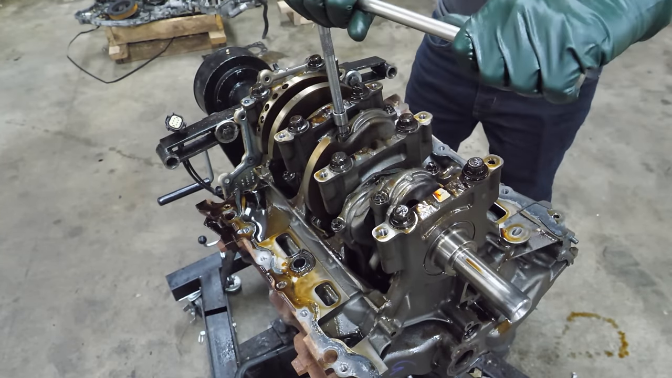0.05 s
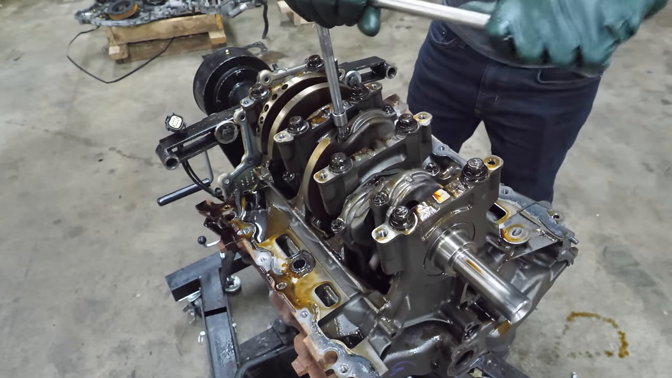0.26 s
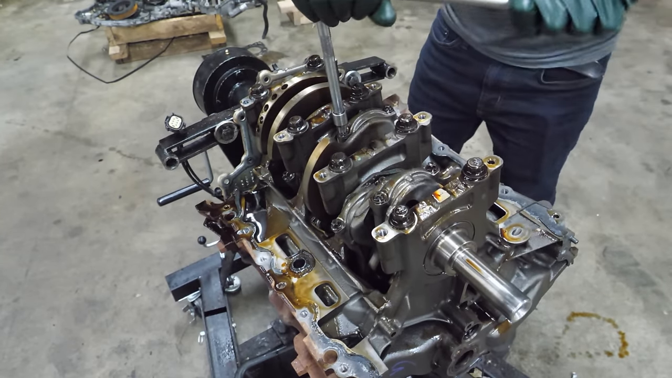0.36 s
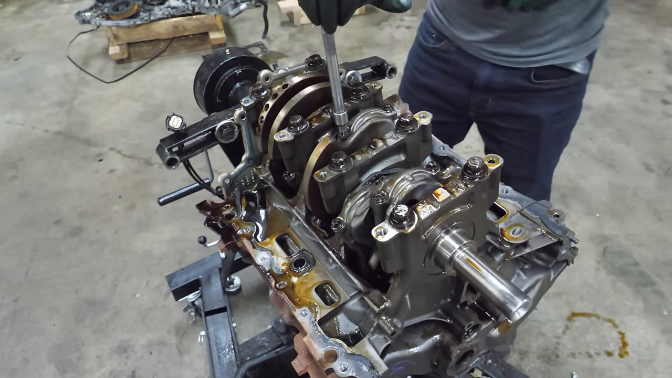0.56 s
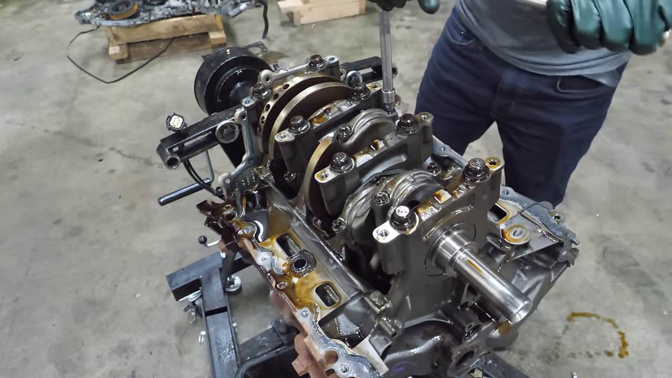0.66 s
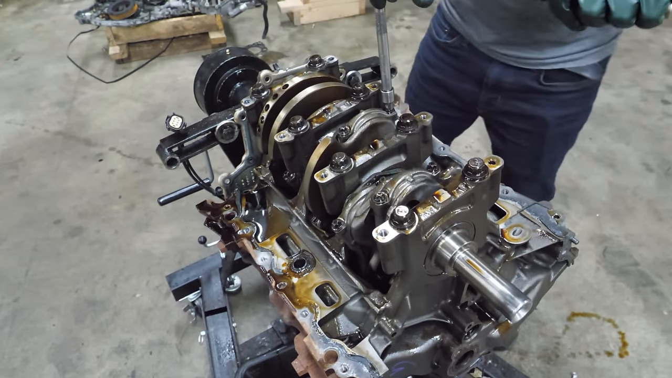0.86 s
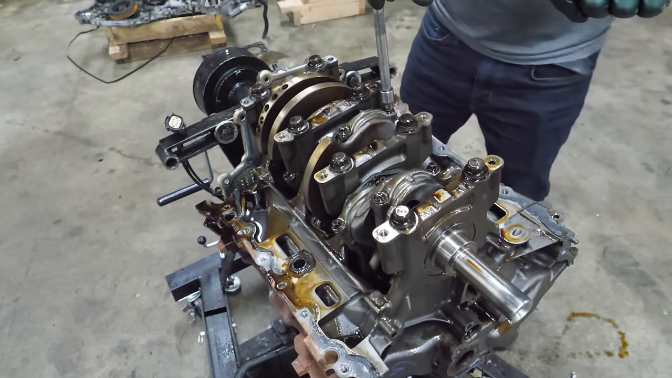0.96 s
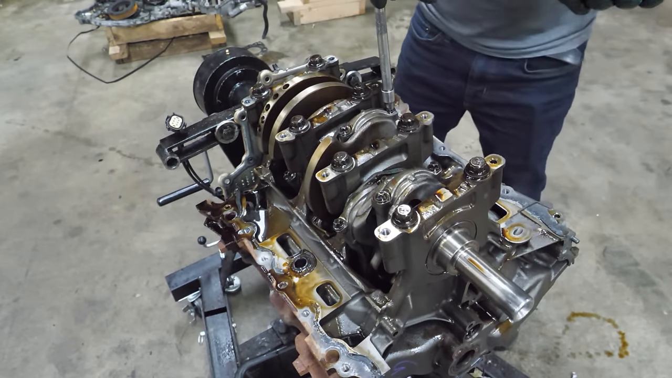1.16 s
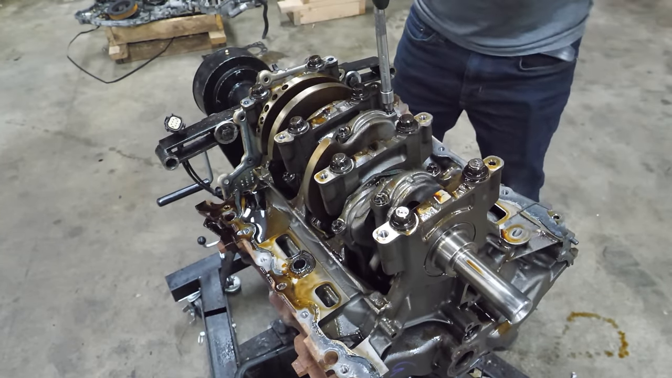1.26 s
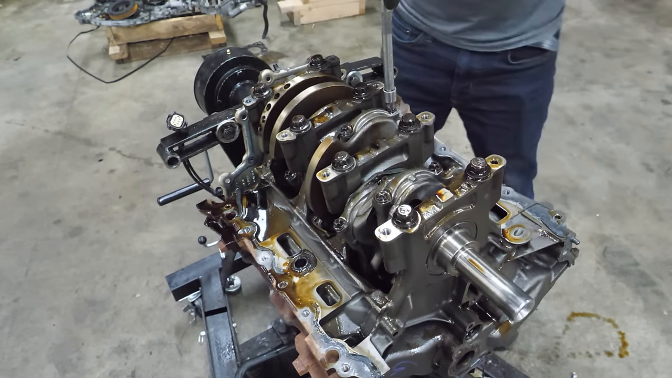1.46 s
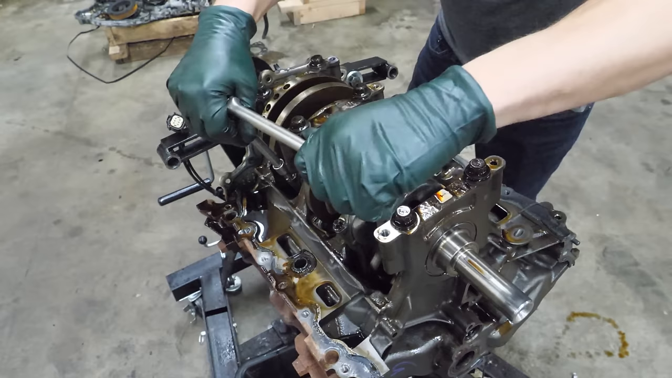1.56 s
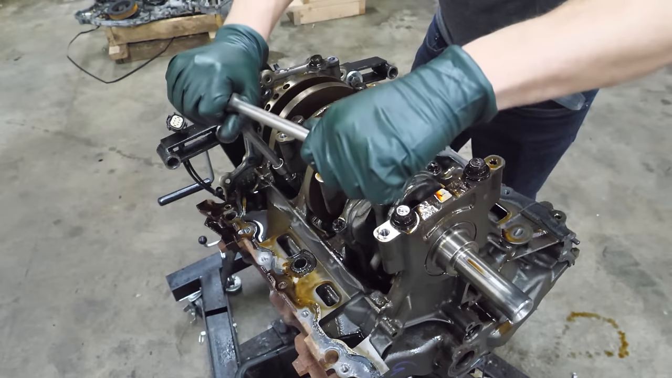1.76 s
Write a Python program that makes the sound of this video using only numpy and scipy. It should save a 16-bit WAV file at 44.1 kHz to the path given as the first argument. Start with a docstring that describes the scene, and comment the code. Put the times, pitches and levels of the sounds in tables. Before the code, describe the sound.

Tight engine bolts crack loose under a long steel bar, close up in a hard-walled workshop. Two sharp metallic snaps come first, then faint tool ticks, then two brighter snaps, each with a brief ring and short echo.

```python
"""A hard-walled workshop, close up: a long breaker bar cracks tight engine bolts loose.
Each time the thread slips, steel chatters for a few milliseconds, bar and socket ring briefly,
the block jolts on its stand and the room answers with an echo that ends abruptly.
Between cracks the tool shifts and gloves rub, over a low room tone."""
import sys
import numpy as np
from scipy import signal
from scipy.fft import rfft, irfft
from scipy.io import wavfile

SR = 44100
rng = np.random.default_rng(int(sys.argv[2]) if len(sys.argv) > 2 else 0)


def master_out(mix):
    """Clip the mix to full scale and print it as 16-bit PCM to the path in sys.argv[1]."""
    frames = np.transpose(np.atleast_2d(mix))
    ceiling = np.clip(frames, -1, 1)
    pcm = np.round(ceiling * 32767).astype(np.int16)
    wavfile.write(sys.argv[1], SR, pcm)


N = 79380

# Thread slips: t/s, level/dB, rise/s, decay/s, body/dB, treble/dB, fizz/dB,
# squeak f/Hz, squeak level/dB, jolt level/dB, jolt fall/s, echo level/dB
SLIPS = [ (-0.017, -8, 0.0022, 0.0032, -1.5, 2, -11, 4700, -18, -19, 0.0029, -41),
         (0.2360, -10, 0.0032, 0.0031, 1, -8.5, -2, 5578, -17, -19, 0.0099, -38),
         (0.9189, -14.5, 0.0014, 0.005, -3.5, 9, 3.5, 3573, -14.5, -11.5, 0.0051, -41),
         (1.1960, -15, 0.0017, 0.0048, -1, 11.5, 7.5, 8520, -16.5, -16, .0035, -41), ]
CHATTER_EQ = [(150, -32), (500, -14.5), (800, -1), (1050, -6.5), (1500, -8), (2200, -5.5), (2750, -13.5),
              (3500, 2.5), (4400, -3.5), (5750, 3), (6300, -2), (6800, -1.5), (7700, -13.5), (9000, -11.5),
              (9800, -16.5), (11100, -17), (11900, -24.5), (15200, -25), (16000, -39)]  # colour of the chatter: f/Hz, level/dB
# Stereo fizz added above about 7 kHz on each crack: f/Hz, side level/dB
TREBLE_SIDE = [(100, -62.5), (5500, -48.5), (7500, -20.5), (14000, -11.5)]
STEEL_MODES = [(1092, -17, 0.054), (2225, -24.5, 0.024), (2355, -16, 0.046), (3858, -14, 0.01),
               (4145, -11.5, 0.036), (4880, -20.5, 0.012), (4950, -7, 0.047), (5470, -10.5, 0.04),
               (5200, -16.5, 0.036), (5570, -18.5, 0.033), (6835, -11.5, 0.034), (7020, -16.5, 0.011),
               (8700, -25.5, 0.063), (11500, -25, 0.034)]  # ring of bar and socket: f/Hz, level/dB, t60/s
ECHO_EQ = [(60, -16.5), (150, -7), (400, -16), (980, -16.5), (1090, -8), (1260, -13), (1450, -9),
           (1900, -8.5), (2500, -12.5), (3300, -4), (4100, -7.5), (4600, -1), (5050, -1.5), (5750, 0),
           (6400, -6.5), (7200, -9), (7900, -14.5), (8800, -16), (9800, -24), (12500, -25), (15200, -29),
           (16000, -37)]  # colour of the workshop's echo: f/Hz, level/dB
ECHO_DECAY = [(100, 0.17), (500, 0.87), (1100, 1.09), (2500, 1.096), (5500, 0.78), (8000, 0.76),
              (14000, 0.76)]  # its decay: f/Hz, t60/s
ECHO_SPREAD = [(100, -18.5), (800, -18.5), (2500, -21), (5500, -24.5), (8000, -5), (13000, -7.5)]  # side signal of the echo: f/Hz, side level/dB
TOOL_TICKS = [(0.612, -53.5, 0.0041, 3400, 0.62), (0.773, -52, 0.015, 4320, 0.55),
              (0.7711, -68.5, 0.0095, 595, 0.3), (0.7719, -57, 0.018, 49.7, 1.4),
              (0.8413, -56, 0.0033, 3300, 1.2), (0.8546, -55, .0012, 8500, 0.38),
              (0.854, -50.5, 0.003, 656, 0.42)]  # small knocks of the tool: t/s, level/dB, decay/s, f/Hz, width/octaves
RUB_FADER = [(0.70, -80), (0.77, -72), (0.82, -66.5), (0.88, -75.5), (0.95, -95), (1.60, -94), (1.68, -68),
             (1.74, -66.5), (1.80, -65.5)]  # swells of glove and sleeve friction: t/s, level/dB
RUB_EQ = [(100, 4), (500, -3), (1000, -2.5), (2200, -3), (3500, -1), (5200, -2.5), (9000, -6),
          (15000, -14.5)]  # colour of the rubbing: f/Hz, level/dB
ROOM_TONE_EQ = [(15, -19.5), (28, -5.5), (48, 1.5), (75, -8), (170, -11), (280, -16.5), (600, -21.5),
                (1400, -30), (5000, -31.5), (9000, -32.5), (15000, -36)]  # colour of the room tone: f/Hz, level/dB
ROOM_TONE_SPREAD = [(100, -23), (700, -9.5), (2500, -3.5), (5500, -2), (13000, -21)]  # side signal of the room tone: f/Hz, side level/dB

BODY_HZ, TREBLE_HZ, TREBLE_WIDTH_HZ, FIZZ_HZ = 2300, 8500, 1000, 9800  # EQ bands set per slip
SPIT_DB, SPIT_HZ, SPIT_DECAY_S = -16, 8500, .0015  # level relative to the chatter
SQUEAK_T60_S = 0.025  # the one mode that each slip drives hardest
KNOCK_DB, KNOCK_BAND_HZ = -4, (815, 2100)  # peak relative to the slip's level plus body
JOLT_DELAY_S, JOLT_WIDTH_S, RECOIL, JOLT_LOW_HZ = .0019, .00055, 1.21, 38
ECHO_RISE_S, ECHO_END_S, ECHO_CUT_S = 0.017, .379, .003
ECHO_EQ_SHARE = 0.2  # how much of a slip's EQ carries into its echo
ECHO_RING_DB, ECHO_RING_HZ = 2, 35  # lift and half-width of the steel's modes in the echo
ECHO_RIPPLE_DB, ECHO_RIPPLE_STEP_HZ = 1.9, 90
EARLY_BOOST, EARLY_S = 1, 0.046  # extra push of the first reflections
ENGINE_HZ, ENGINE_DB, ENGINE_T60_S = 1088, -18, 0.77  # long ring, level relative to the echo
TICK_RISE_S, TICK_SEND_DB = 0.0008, -25  # echo send for a decay of EARLY_S; shorter ticks send less
GLOVE_AT_S, GLOVE_WIDTH_S, GLOVE_HZ, GLOVE_WIDTH_HZ, GLOVE_DB = 1.703, 0.032, 2157, 170, -68
ROOM_TONE_DB, CEILING, TOP_HZ = -63, .8, 15900


def bolt_cracks():
    """Each slip of the thread stacks four layers: snap, knock, jolt and echo."""
    out = np.zeros((2, N))
    for at, level_db, rise, decay, *eq, squeak_hz, squeak_db, jolt_db, fall, echo_db in SLIPS:
        body_db = eq[0]
        add(out, at, snap(level_db, rise, decay, eq, squeak_hz, squeak_db))
        add(out, at, amp(level_db + body_db + KNOCK_DB) * knock(rise))
        add(out, at, amp(jolt_db) * jolt(fall))
        add(out, at, amp(echo_db) * echo(eq))
    return out


def snap(level_db, rise, decay, eq, squeak_hz, squeak_db):
    """The thread lets go: a bright spit, and chatter that swells, dies and sets the steel ringing."""
    t = np.arange(8192) / SR
    attack = np.minimum(t / rise, 1)
    envelope = attack * np.exp(-np.maximum(t - rise, 0) / decay)
    chatter = wide_noise(lambda f: read(CHATTER_EQ, f) + slip_eq(f, *eq), TREBLE_SIDE, len(t))
    chatter *= envelope
    chatter *= np.linalg.norm(envelope) / np.linalg.norm(chatter.mean(0))  # envelope sets the energy
    spit = noise(lambda f: read(CHATTER_EQ, f) - 20 * np.log10(1 + (SPIT_HZ / (f + 1)) ** 8), len(t))
    spit *= amp(SPIT_DB) * t / SPIT_DECAY_S * np.exp(1 - t / SPIT_DECAY_S)
    steel = sum(amp(db + slip_eq(hz, *eq)) * ring(t, hz, t60) for hz, db, t60 in STEEL_MODES)
    squeak = amp(squeak_db) * attack * ring(t, squeak_hz, SQUEAK_T60_S)
    return amp(level_db) * (chatter + spit + attack * steel) + squeak


def slip_eq(hz, body_db, treble_db, fizz_db):
    """Voices one crack, in dB: low shelf for body, bell for treble, high shelf for fizz."""
    body = 1 / (1 + (hz / BODY_HZ) ** 6)
    treble = np.exp(-((hz - TREBLE_HZ) / TREBLE_WIDTH_HZ) ** 2)
    fizz = 1 - 1 / (1 + (hz / FIZZ_HZ) ** 20)
    return body_db * body + treble_db * treble + fizz_db * fizz


def knock(rise):
    """The bolt's sudden release: a sharp mid-range click at the top of the swell."""
    band = signal.butter(2, KNOCK_BAND_HZ, "bandpass", fs=SR, output="sos")
    click = signal.sosfilt(band, np.arange(8192) == round(rise * SR))
    return click / abs(click).max()


def jolt(fall):
    """The block recoils and lurches: one low push of air."""
    t = np.arange(8192) / SR - JOLT_DELAY_S
    push = (1 + np.tanh(t / JOLT_WIDTH_S * 2)) / 2 * np.exp(-t / fall)
    recoil = RECOIL / 2 * np.exp(-(t / JOLT_WIDTH_S + .5) ** 2)
    low_cut = signal.butter(2, JOLT_LOW_HZ, "highpass", fs=SR, output="sos")
    return signal.sosfilt(low_cut, push - recoil)


def echo(eq=(0, 0, 0)):
    """Hard walls throw back a diffuse wash, with the engine's long ring in it; the tail is gated."""
    t = np.arange(32768) / SR
    bumps = rng.standard_normal(512)

    def colour(f):
        """The room's colour, with the steel's modes and chance peaks in it."""
        peaks = sum(1 / (1 + ((f - hz) / ECHO_RING_HZ) ** 2) for hz, _, _ in STEEL_MODES)
        ripple = ECHO_RIPPLE_DB * np.interp(f / ECHO_RIPPLE_STEP_HZ, np.arange(len(bumps)), bumps)
        return read(ECHO_EQ, f) + ECHO_EQ_SHARE * slip_eq(f, *eq) + ECHO_RING_DB * peaks + ripple

    hz, when, bands = signal.stft(wide_noise(colour, ECHO_SPREAD, len(t)), SR, nperseg=256)
    fade = amp(-60 * when / read(ECHO_DECAY, hz)[:, None])
    wash = signal.istft(bands * fade, SR, nperseg=256)[1][:, :len(t)]
    wash *= 1 + EARLY_BOOST * np.exp(-t / EARLY_S)
    engine = amp(ENGINE_DB) * ring(t, ENGINE_HZ, ENGINE_T60_S)
    gate = (1 - np.tanh((t - ECHO_END_S) / ECHO_CUT_S)) / 2
    return (wash + engine) * np.minimum(t / ECHO_RISE_S, 1) * gate


def tool_ticks():
    """The socket shifts and seats on a bolt head: gritty ticks with a touch of room."""
    out, t, room = np.zeros((2, N)), np.arange(8192) / SR, echo()
    for at, level_db, decay, centre_hz, octaves in TOOL_TICKS:
        grit = noise(lambda f: -20 * np.log10(1 + (np.log2((f + 1) / centre_hz) / octaves) ** 2), len(t))
        envelope = np.minimum(t / TICK_RISE_S, 1) * np.exp(-np.maximum(t - TICK_RISE_S, 0) / decay)
        add(out, at, amp(level_db) * grit * envelope)
        add(out, at, amp(level_db + TICK_SEND_DB) * np.sqrt(decay / EARLY_S) * room)
    return out


def gloves():
    """Rubber gloves and sleeves rub as the grip changes, with one faint squeak."""
    t = np.arange(N) / SR
    rub = amp(np.interp(t, *np.transpose(RUB_FADER))) * noise(lambda f: read(RUB_EQ, f), N)
    squeak = noise(lambda f: -20 * np.log10(1 + ((f - GLOVE_HZ) / GLOVE_WIDTH_HZ) ** 2), N)
    swell = np.exp(-((t - GLOVE_AT_S) / GLOVE_WIDTH_S) ** 2 / 2)
    return rub + amp(GLOVE_DB) * squeak * swell


def room_tone():
    """A steady bed of low rumble and thin hiss."""
    return amp(ROOM_TONE_DB) * wide_noise(lambda f: read(ROOM_TONE_EQ, f), ROOM_TONE_SPREAD, N)


def amp(db):
    """Decibels to gain."""
    return 10 ** (np.asarray(db) / 20)


def read(points, hz):
    """Reads a curve on a log-frequency axis."""
    f, value = np.transpose(points)
    return np.interp(np.log(hz + 1), np.log(f + 1), value)


def add(mix, start_s, sound):
    """Lays a mono or stereo sound into the mix, trimming any overhang."""
    at = round(start_s * SR)
    sound = sound[..., max(-at, 0):]
    part = mix[:, max(at, 0):][:, :sound.shape[-1]]
    part += sound[..., :part.shape[-1]]


def ring(t, hz, t60):
    """One dying mode at a random phase."""
    return amp(-60 * t / t60) * np.sin(2 * np.pi * (hz * t + rng.random()))


def noise(colour, size):
    """Noise of rms 1, its spectrum shaped in dB by colour(Hz)."""
    hz = np.fft.rfftfreq(size, 1 / SR)
    wave = irfft(amp(colour(hz)) * np.exp(2j * np.pi * rng.random(len(hz))), size)
    return wave / np.sqrt(np.mean(wave ** 2) + 1e-20)


def wide_noise(colour, spread, size):
    """Stereo noise: a shared mid and a weaker side."""
    mid = noise(colour, size)
    side_gain = amp(read(spread, np.fft.rfftfreq(size, 1 / SR)))
    side = irfft(rfft(noise(colour, size)) * side_gain, size)
    return np.array([mid + side, mid - side])


def scene():
    """The work sits in the middle; echo and room tone spread a little."""
    return bolt_cracks() + tool_ticks() + gloves() + room_tone()


def record(dry):
    """Soft-clips the peaks, then cuts the very top."""
    rounded = dry / (1 + (dry / CEILING) ** 4) ** (1 / 4)
    high_cut = signal.firwin(255, TOP_HZ, window=("kaiser", 9), fs=SR)
    return signal.oaconvolve(rounded, high_cut[None], "same")


dry = scene()
out = record(dry)
master_out(out)
```